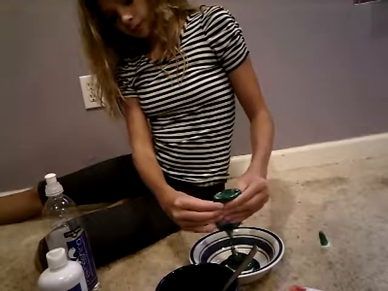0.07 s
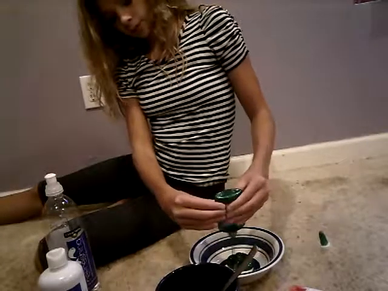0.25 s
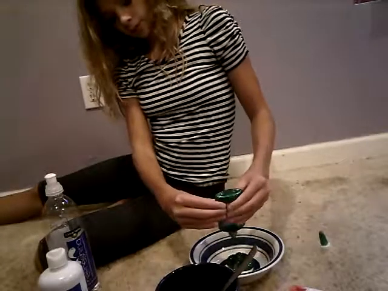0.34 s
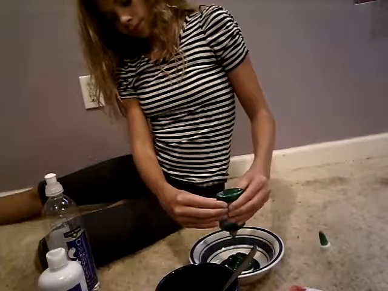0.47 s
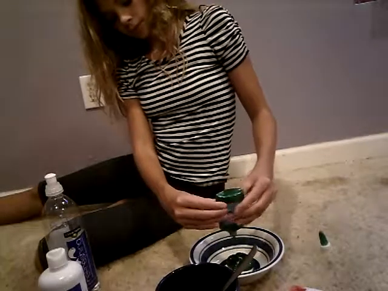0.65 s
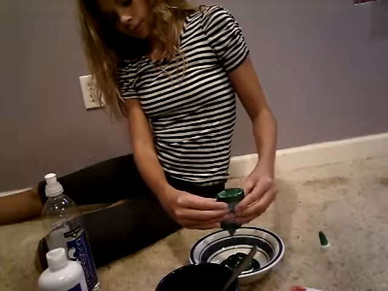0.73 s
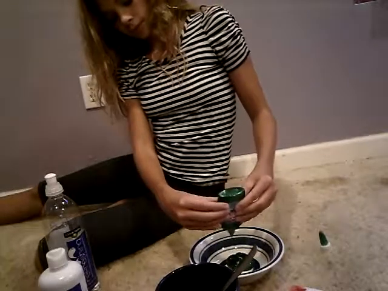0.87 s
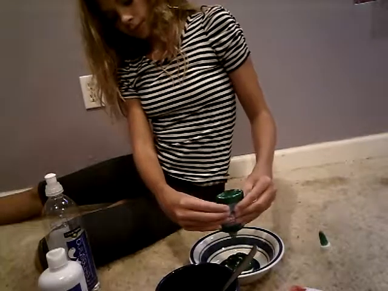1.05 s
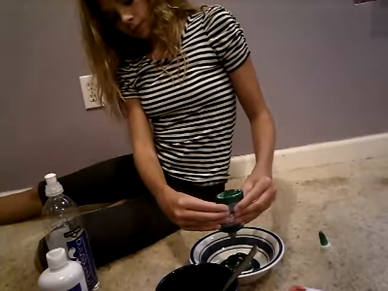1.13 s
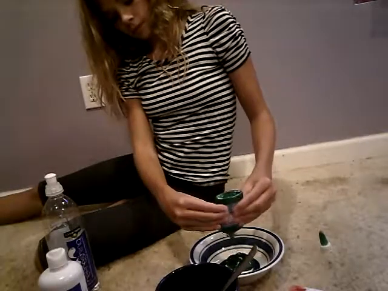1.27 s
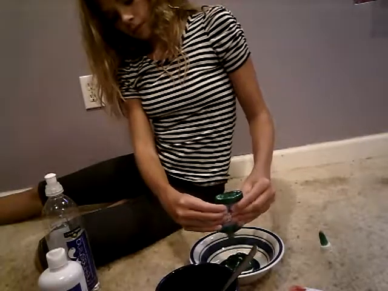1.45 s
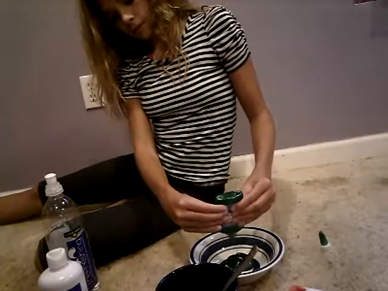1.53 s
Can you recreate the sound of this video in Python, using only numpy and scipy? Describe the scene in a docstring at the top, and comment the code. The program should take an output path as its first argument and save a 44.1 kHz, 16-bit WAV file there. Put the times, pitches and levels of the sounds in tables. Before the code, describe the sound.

Two short squelchy bursts from a squeezed glue bottle, indoors, over faint trickling and low hum

```python
"""Low house hum and hiss run throughout, under faint reverberant plinks like water trickling next door.
A glue bottle is squeezed twice, close by in a carpeted room, and air bursts through the glue at its nozzle:
a deep pop at about 0.2 s, then a bright wet snap at about 1.3 s. Bubbles are dying, gliding sines; spits of
air are coloured noise bursts; plinks blend tone and splash; the hum and hiss are shaped noise."""
import sys
import numpy as np
from scipy import signal
from scipy.fft import rfft, irfft
from scipy.io import wavfile

SR = 44100
rng = np.random.default_rng(int(sys.argv[2]) if len(sys.argv) > 2 else 0)


def store_pcm(level_fs):
    """Save levels as 16-bit WAV."""
    pcm = np.round(np.clip(level_fs, -1, 1) * 32767).astype(np.int16)
    wavfile.write(sys.argv[1], SR, np.atleast_2d(pcm).T)


N = 70560  # length in samples (1.6 s)


def gain_of(db):
    """Amplitude factor for a level in dB."""
    return 10 ** (np.asarray(db) / 20)


def evened(x):
    """Scales a signal to an RMS of 1."""
    return x / np.sqrt(np.mean(x ** 2) + 1e-20)


def read(points, hz):
    """Reads a curve of (frequency, value) points along a log frequency axis."""
    point_hz, value = np.transpose(points)
    return np.interp(np.log(hz + 1), np.log(point_hz + 1), value)


def add(mix, start_s, sound):
    """Lays a sound into the mix, cut off at the end of the scene."""
    part = mix[round(start_s * SR):][:len(sound)]
    part += sound[:len(part)]


def coloured(x, points, scale=1):
    """Filters x by a dB spectrum, its dB values multiplied by scale."""
    hz = np.fft.rfftfreq(2 * N, 1 / SR)
    spectrum = rfft(x, 2 * N) * gain_of(scale * read(points, hz))
    return irfft(spectrum)[..., :N]


def band_noise(length, hz, width_hz):
    """White noise through two equal resonances in a row, each width_hz wide, at an RMS of 1."""
    settle = 8000  # samples dropped while the resonances build up
    radius = np.exp(-np.pi * width_hz / SR)
    poles = [1, -2 * radius * np.cos(2 * np.pi * hz / SR), radius * radius]
    noise = rng.standard_normal(length + settle)
    once = signal.lfilter([1, 0, -1], poles, noise)
    twice = signal.lfilter([1], poles, once)
    return evened(twice[settle:])


def swell(rise_s, t60_s):
    """Times and envelope of a sine-squared rise (0.1 ms longer than rise_s), then exponential decay."""
    t = np.arange(0, 4000) / SR
    rise_s = rise_s + 1e-4
    attack = np.sin(np.pi / 2 * np.minimum(t / rise_s, 1)) ** 2
    decay = gain_of(-60 * np.maximum(t - rise_s, 0) / t60_s)
    return t, attack * decay


def bubble(db, hz, rise_s, t60_s, glide):
    """A bursting air pocket rings as a dying sine, its pitch moving by 2 * glide of hz per second."""
    t, shape = swell(rise_s, t60_s)
    return gain_of(db) * shape * np.sin(2 * np.pi * hz * t * (1 + glide * t))


def reverb(x, t60s, gap_s, same):
    """Two noise tails, alike by the share same, each band dying at its own speed after a gap."""
    a, b = rng.standard_normal((2, SR // 2))
    noise = np.array([a, same * a + np.sqrt(1 - same ** 2) * b])
    hz, t, bands = signal.stft(noise, SR, nperseg=256)
    decay = gain_of(-60 * t / read(t60s, hz)[:, None])
    tail = signal.istft(bands * decay, SR, nperseg=256)[1]
    tail = tail / np.linalg.norm(tail[0])
    tail = np.pad(tail, ((0, 0), (round(gap_s * SR), 0)))
    return signal.fftconvolve(x[None], tail, axes=1)[:, :N]


# spectrum shape of the room tone and hiss: (frequency [Hz], relative level [dB])
FLOOR_COLOUR = [(15, -26), (25, -2), (49, -27), (102, -11), (363, -20.5), (405, -20.5), (463, -20.5),
                (659, -16), (1940, -20.5), (2840, -16.5), (5430, -27.5), (14800, -32), (16000, -30.5)]
# likeness of left and right, negative when opposed: (frequency [Hz], correlation [-1 to 1])
FLOOR_SAME = [(60, 0.98), (180, 0.59), (550, 0.27), (1650, -0.18), (4970, -0.034), (15000, -0.089)]
# wavering hum bands: (frequency [Hz], width of each resonance [Hz], RMS level [dB])
HUM = [(60.4, 11, -92), (91.5, 6.5, -76.5), (120.2, 6.4, -82.5), (203.9, 11.5, -82), (417.7, 11.2, -81)]
FLOOR_DB = -64  # RMS of the room tone and hiss, without the hum


def floor():
    """Stereo noise shaped in frequency, most alike in the bass, plus narrow noise bands as wavering hum."""
    frames = N // 256 + 5
    hz = np.fft.rfftfreq(1024, 1 / SR)
    a, b, c, d = rng.standard_normal((frames, 513, 4)).T
    same = np.clip(read(FLOOR_SAME, hz), -1, 1)[:, None]
    left = a + 1j * b
    right = same * left + np.sqrt(1 - same ** 2) * (c + 1j * d)
    bands = np.array([left, right]) * gain_of(read(FLOOR_COLOUR, hz))[:, None]
    hiss = signal.istft(bands, nperseg=1024, noverlap=768)[1][:, :N]
    hum = sum(gain_of(db) * band_noise(N, f, width) for f, width, db in HUM)  # same in both channels
    return gain_of(FLOOR_DB) * evened(hiss) + hum


# single plinks: (time [s], level before the tone-splash blend and room mix [dB], pitch [Hz],
# splash share [0 to 1])
PLINKS = [(0.0186, -54, 3860, 0.58), (0.1192, -52, 4360, 0.4), (0.2493, -48.5, 1090, 0.45),
          (0.2867, -43, 2088, 0.26), (0.3193, -48.5, 1213, 0.34), (0.335, -47, 1228, 0.41),
          (0.3825, -49, 2074, 0.45), (0.4474, -53, 3835, 0.4), (0.5176, -50, 3330, 0.47),
          (0.5937, -56, 2770, 0.34), (0.6798, -64, 1850, 0.16), (0.7337, -51, 2800, 0.42),
          (0.7913, -46, 2220, 0.48), (0.8152, -50.5, 2515, 0.48), (0.94, -56, 3194, 0.4),
          (1.0687, -61.5, 3200, 0.2), (1.0997, -56, 3680, 0.47), (1.1734, -49, 4160, 0.3),
          (1.189, -55, 2740, 0.4), (1.2402, -53.5, 2370, 0.5), (1.297, -43, 2210, 0.34),
          (1.4551, -61, 2640, 0.3), (1.487, -55.5, 4400, 0.25), (1.511, -59.5, 4150, 0.46),
          (1.5442, -53, 1214, 0.39)]
# decay of the far hard room: (frequency [Hz], t60 [s])
FAR_ROOM = [(1000, 0.17), (3000, 0.22), (6000, 0.14)]
# shape of the left-right tilt, scaled per channel below: (frequency [Hz], tilt before scaling [dB])
FAR_PAN = [(1000, -2), (2500, 3.1), (4200, -8), (6000, 1)]
PLINK_RISE_S, PLINK_T60_S, PLINK_GLIDE = 0.0021, 0.046, 1.99
PLINK_DIRECT_DB, PLINK_ROOM_DB = -6, 1.5
SPLASH_HZ, SPLASH_WIDTH_HZ = 3480, 2470
SMALL_PER_S, SMALL_LO_HZ, SMALL_HI_HZ = 60, 1205, 5478
SMALL_DB, SMALL_SPREAD_DB = -66, 3.5  # about the quietest level, and how far the louder ones rise


def trickle():
    """Far plinks, each a gliding tone with a noise splash, and random small ones, smeared by a hard room."""
    plinks = np.zeros(N)
    for start_s, db, hz, splash in PLINKS:
        shape = swell(PLINK_RISE_S, PLINK_T60_S)[1]
        noise = gain_of(db) * shape * band_noise(4000, SPLASH_HZ, SPLASH_WIDTH_HZ)
        tone = bubble(db, hz, PLINK_RISE_S, PLINK_T60_S, PLINK_GLIDE)
        add(plinks, start_s, (1 - splash) * tone + splash * noise)
    small_count = round(SMALL_PER_S * N / SR)
    for when, height, strength in rng.random((small_count, 3)):
        hz = SMALL_LO_HZ * (SMALL_HI_HZ / SMALL_LO_HZ) ** height
        db = SMALL_DB - SMALL_SPREAD_DB * np.log(strength + 0.018)  # few are loud
        add(plinks, when * N / SR, bubble(db, hz, PLINK_RISE_S, PLINK_T60_S, PLINK_GLIDE))
    smear = reverb(plinks, FAR_ROOM, gap_s=0.004, same=0)
    wet = gain_of(PLINK_DIRECT_DB) * plinks + gain_of(PLINK_ROOM_DB) * smear
    return np.array([coloured(wet[0], FAR_PAN, 0.55), coloured(wet[1], FAR_PAN, -0.47)])


# air pockets bursting at the nozzle: (time [s], level before panning [dB], starting pitch [Hz],
# rise less 0.1 ms [s], t60 [s], glide, half the relative pitch change [1/s])
POCKETS = [(0.2075, -38.5, 1504, 0.00046, 0.013, 1), (.2108, -26.5, 710, 0.0011, 0.031, -3),
           (.2150, -36, 518, 0.0025, 0.044, 0.5), (0.2186, -18, 310, 0.0047, 0.058, -0.75),
           (0.2206, -33.5, 425, .003, 0.031, 4), (.2445, -39.5, 514, 0.0017, 0.038, -1),
           (1.3208, -35.5, 889, 0.0021, 0.025, 3), (1.3213, -31.5, 1530, 0.0014, 0.016, 4.5),
           (1.3231, -35, 2028, 0.0012, .016, -4), (1.331, -39.5, 236, 0.0041, 0.025, -8),
           (1.3327, -41.5, 1055, 0.0013, 0.026, 3.5), (1.3338, -34, 4215, 0.0018, 0.024, 2)]
# spits of air: (time [s], noise level before colouring [dB], rise less 0.1 ms [s], t60 [s])
SPITS = [(0.2084, -47, 0.0027, 0.048), (1.3207, -30, 0.0019, 0.018), (1.332, -45.5, 0.0032, 0.02)]
# filter on the spits: (frequency [Hz], gain [dB])
SPIT_COLOUR = [(1000, -5.5), (3000, 6), (4400, 9.5), (6500, -9.5), (8500, -7.5), (10600, -3), (12600, -5.5),
               (15500, -6)]
# decay of the carpeted room: (frequency [Hz], t60 [s])
ROOM = [(100, 0.47), (250, 0.24), (700, .2), (2000, 0.35), (5000, 0.23), (12000, .16)]
# filter on the sound sent into the room: (frequency [Hz], gain [dB])
ROOM_COLOUR = [(100, -3.5), (300, -16.5), (800, -8), (2500, -17), (6000, -4.5), (14000, -11.5)]
LEAD_S, PAN_DB = 0.00009, 0.3  # left hears the bottle earlier and louder by this much


def bottle():
    """Air pockets ring as bubbles and spits of air hiss at the nozzle, heard direct and through the room."""
    pops, spits = np.zeros((2, N))
    for start_s, *pocket in POCKETS:
        add(pops, start_s, bubble(*pocket))
    for start_s, db, rise_s, t60_s in SPITS:
        shape = swell(rise_s, t60_s)[1]
        add(spits, start_s, gain_of(db) * shape * rng.standard_normal(4000))
    nozzle = pops + coloured(spits, SPIT_COLOUR)
    hz = np.fft.rfftfreq(N, 1 / SR)
    late = irfft(rfft(nozzle) * np.exp(-2j * np.pi * hz * LEAD_S), N)  # delay by phase shift
    direct = np.array([nozzle * gain_of(PAN_DB / 2), late * gain_of(-PAN_DB / 2)])
    return direct + reverb(coloured(nozzle, ROOM_COLOUR), ROOM, gap_s=0.011, same=0.43)


def scene():
    """Sums the room tone, the trickle and the bottle."""
    return floor() + trickle() + bottle()


EDGE_HZ = 15800  # upper band limit


def record(dry):
    """Low-passes the scene steeply and adds a small constant offset."""
    low_pass = signal.firwin(511, EDGE_HZ, window=("kaiser", 9), fs=SR)
    return signal.oaconvolve(dry, low_pass[None], "same") - 0.0005


dry = scene()
out = record(dry)
store_pcm(out)
```